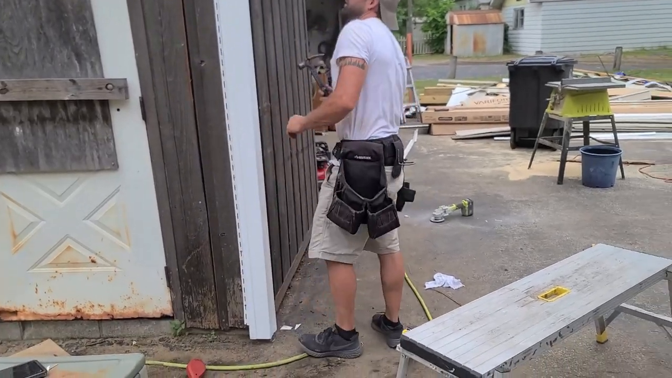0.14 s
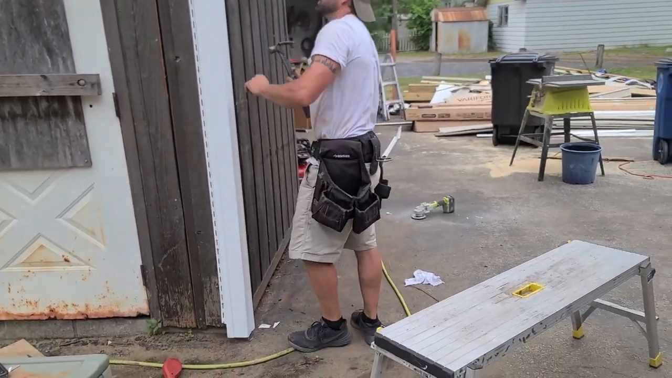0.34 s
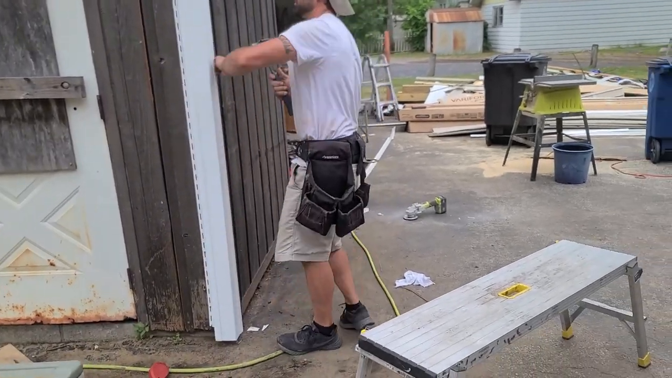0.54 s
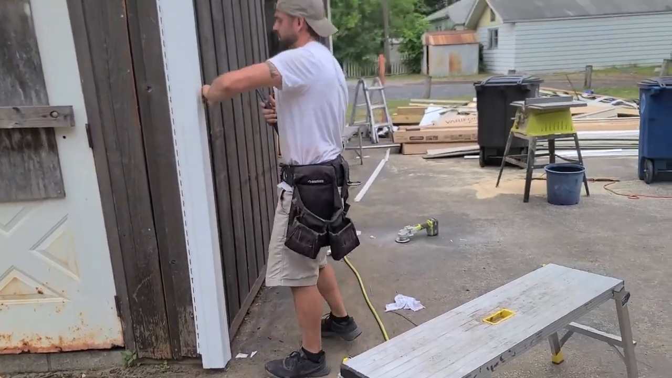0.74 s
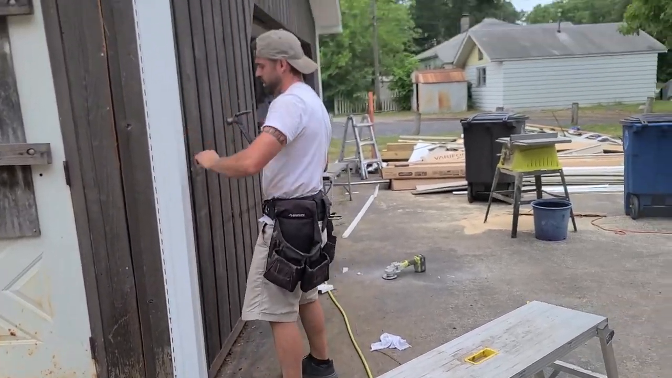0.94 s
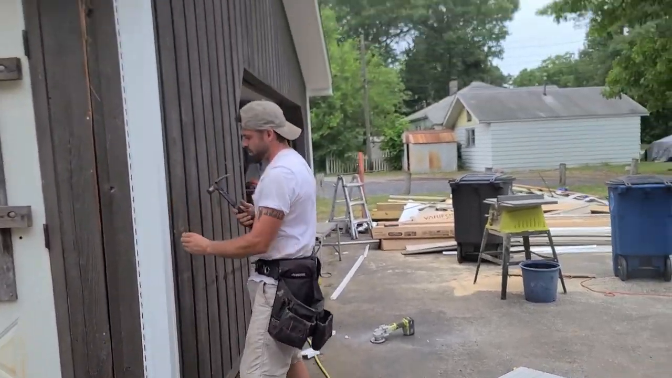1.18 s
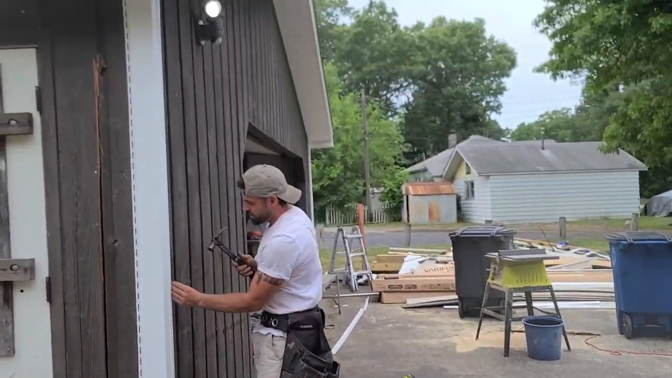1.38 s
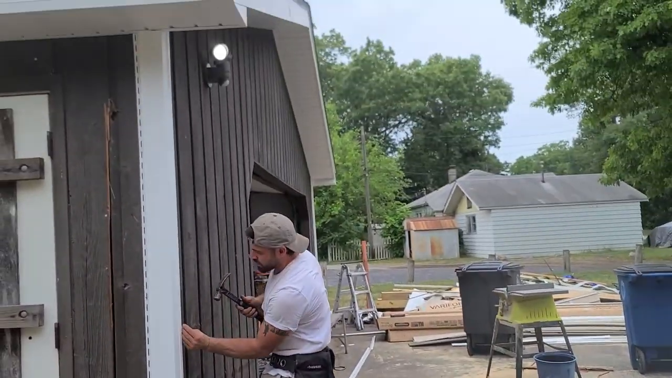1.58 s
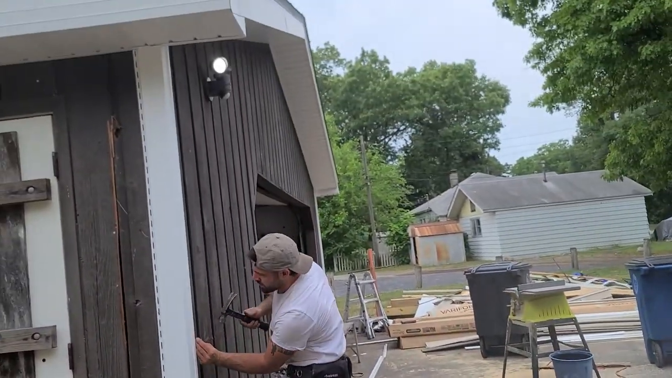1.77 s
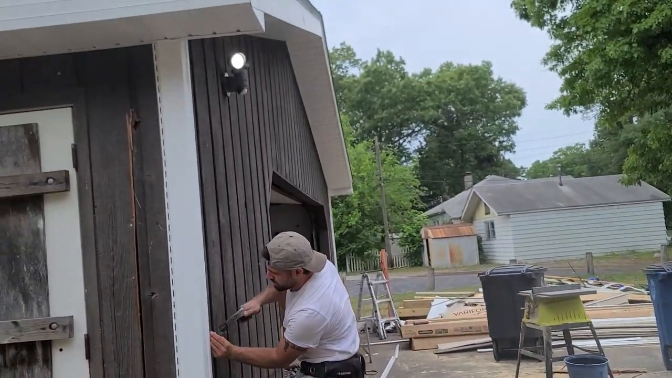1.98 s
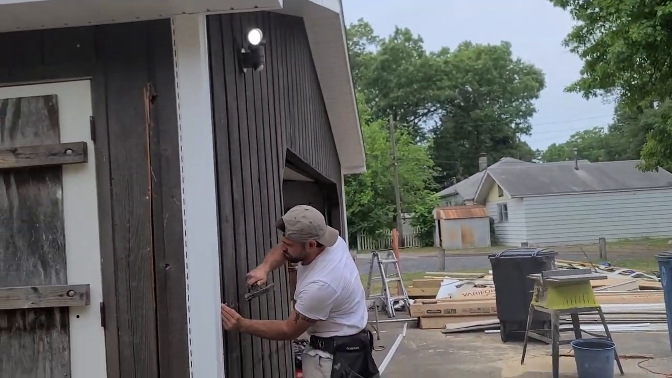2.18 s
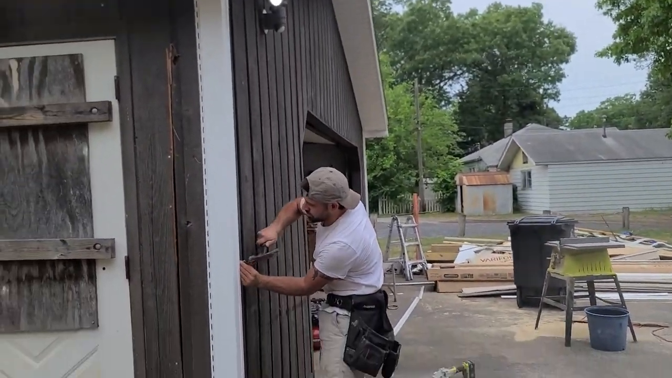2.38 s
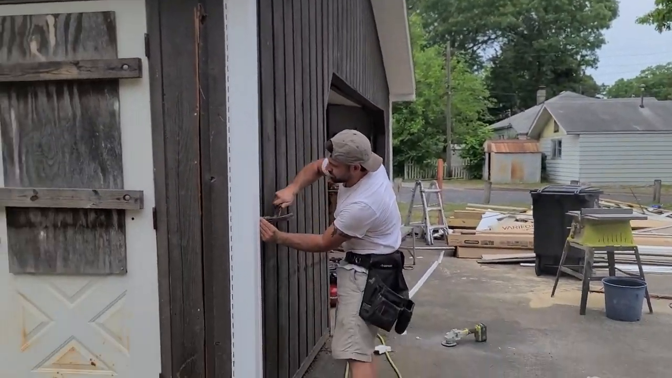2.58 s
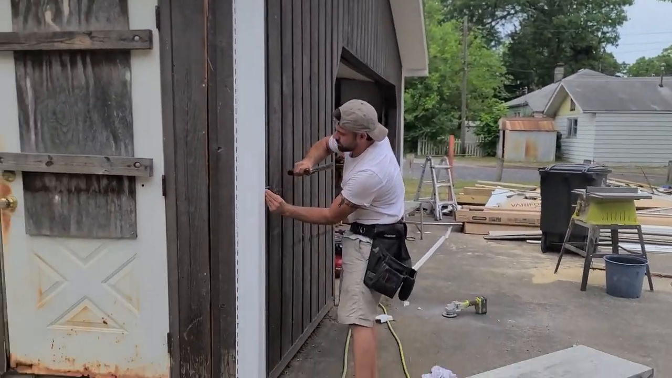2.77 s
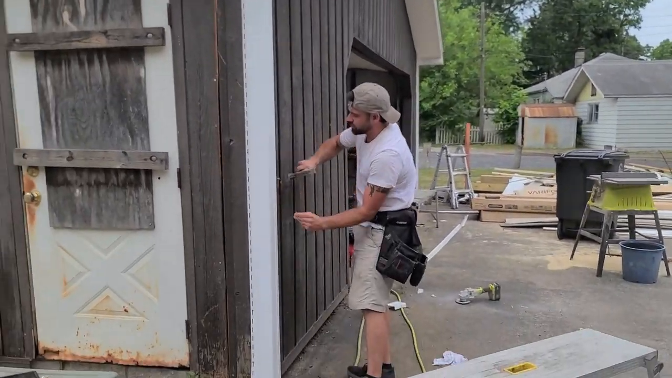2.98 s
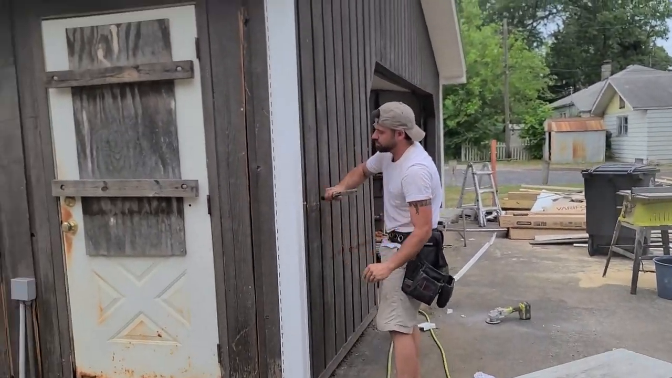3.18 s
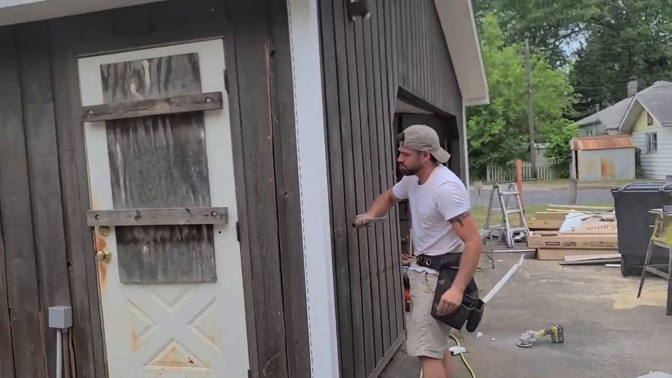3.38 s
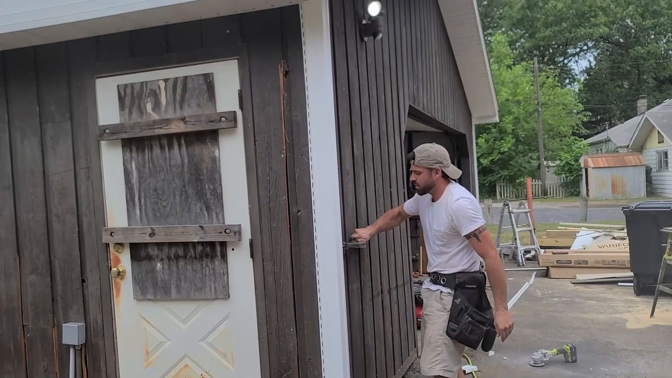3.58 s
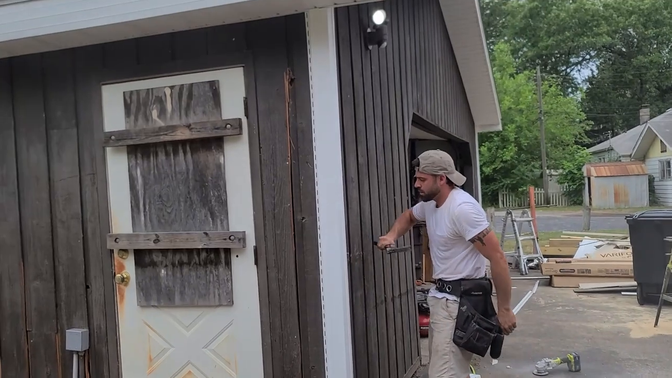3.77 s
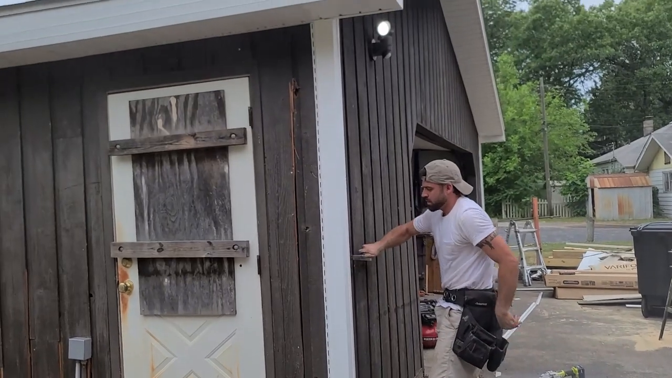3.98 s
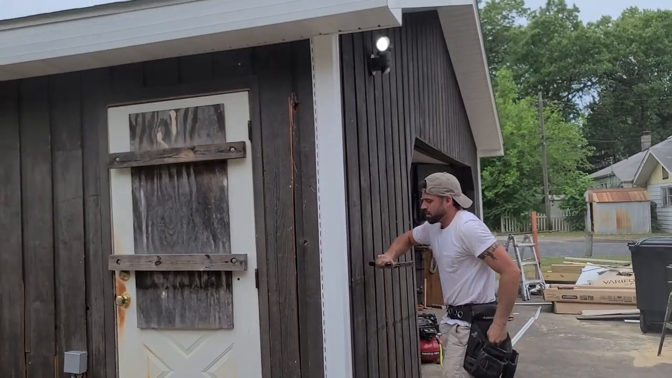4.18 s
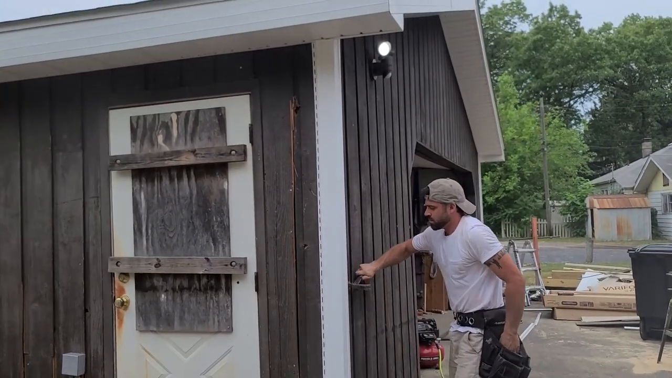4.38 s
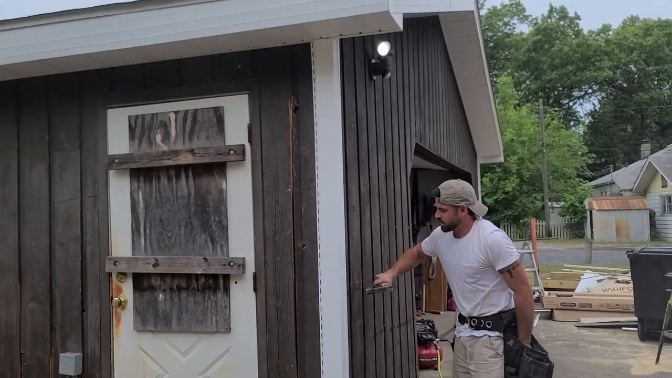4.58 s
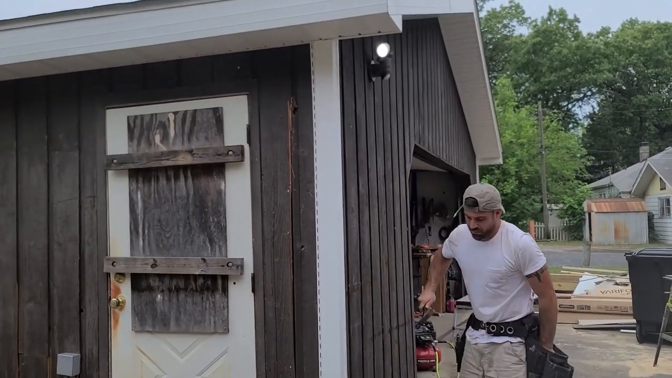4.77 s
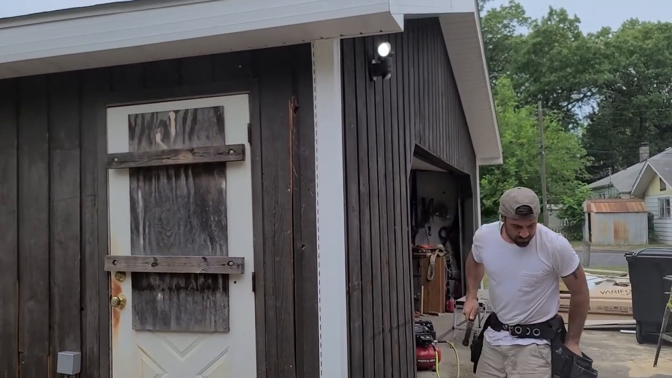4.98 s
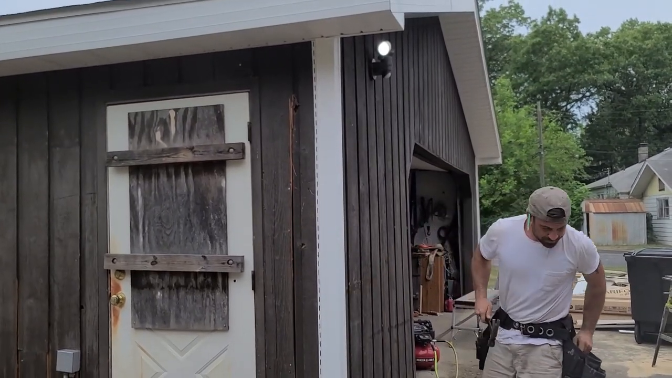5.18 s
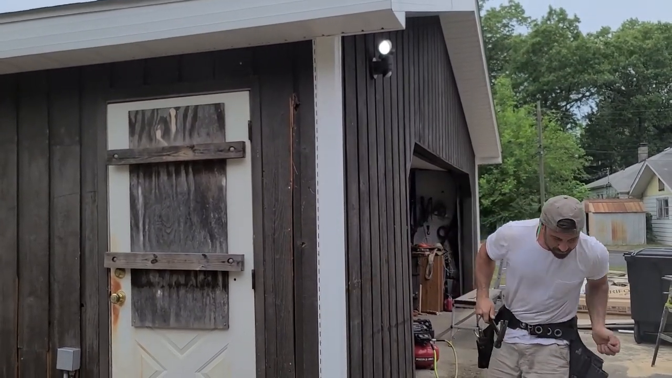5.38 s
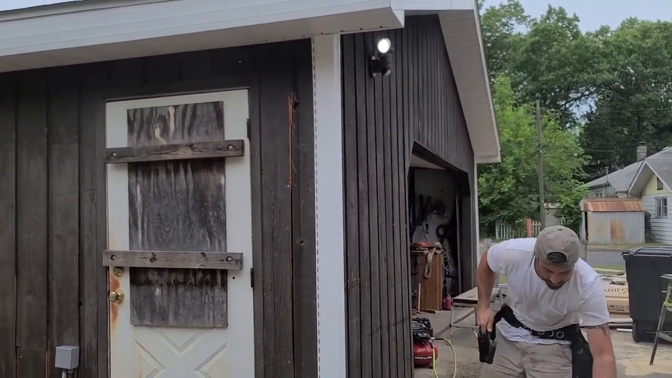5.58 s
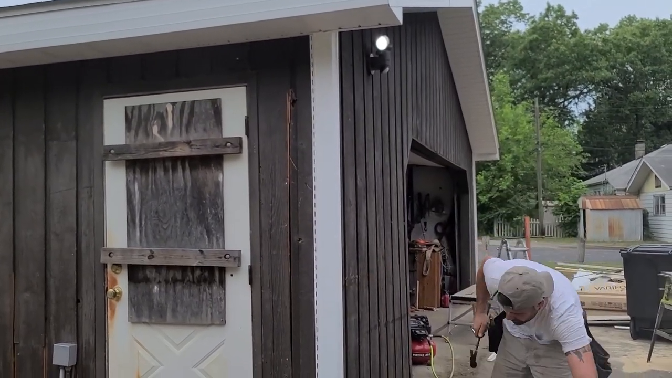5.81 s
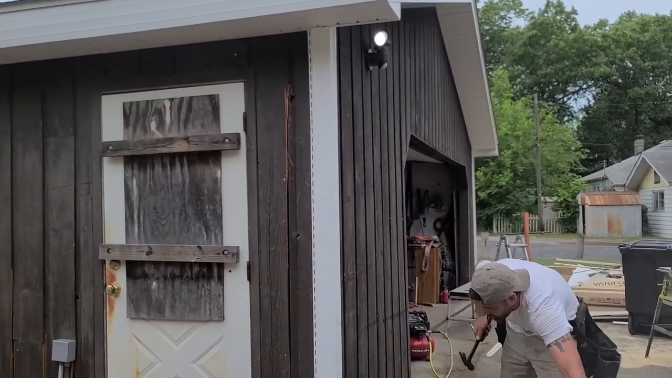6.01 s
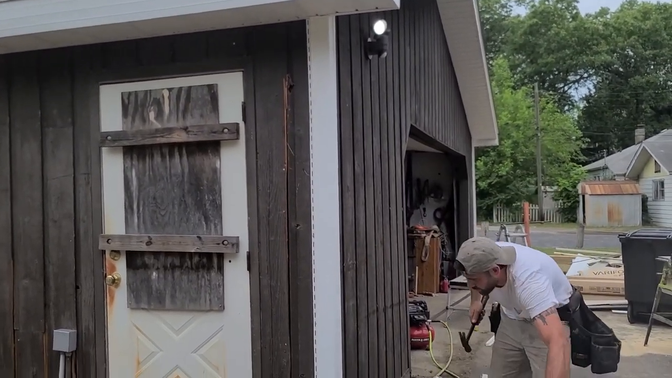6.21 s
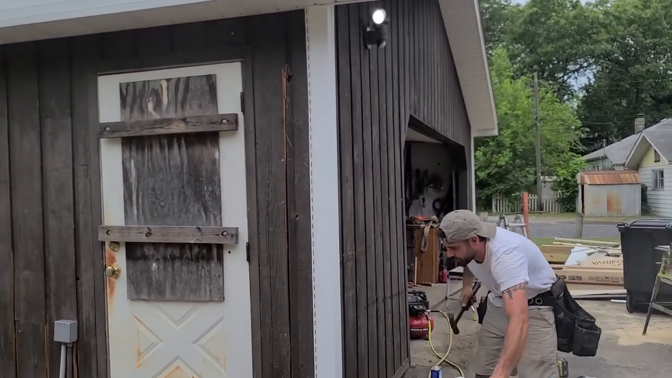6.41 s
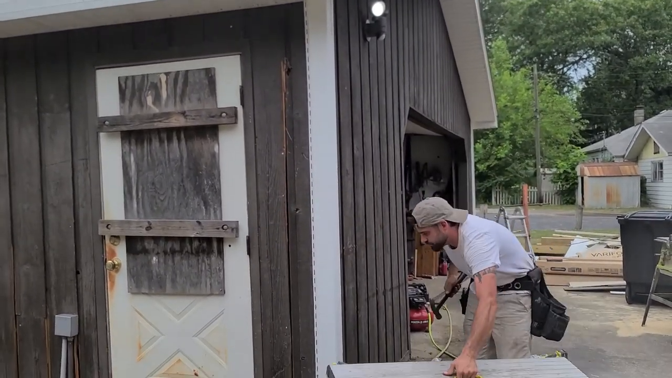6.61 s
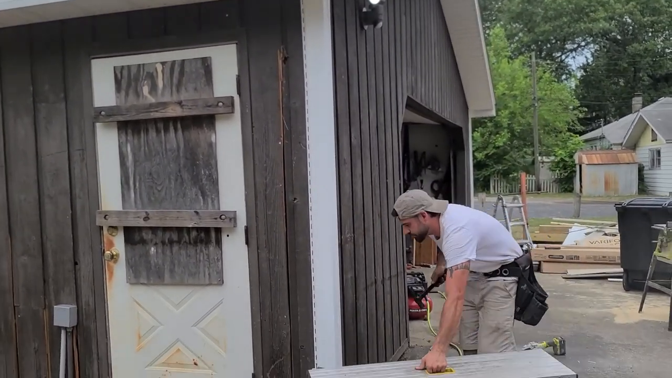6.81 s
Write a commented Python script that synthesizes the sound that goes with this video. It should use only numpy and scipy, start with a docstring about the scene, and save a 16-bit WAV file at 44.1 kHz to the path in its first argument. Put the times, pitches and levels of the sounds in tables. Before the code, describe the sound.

Over distant traffic, a soft breeze and a far bird's falling whistles, someone shuffles on concrete with tools knocking, once loudly. Seven sharp hammer blows follow, nailing a vinyl corner post to a shed; the wooden wall rings hollow and the sound scatters briefly around the yard. Afterwards come light tool clicks, a faint shoe squeak, a dull thud and the rattle of a metal work bench being grabbed.

```python
"""Outdoors at a shed, a hammer drives a nail through a vinyl corner post into a hollow wooden wall.
Each blow cracks, rings the wall's modes, rattles the post and scatters back from the yard.
Around the blows nails ring as they touch, tools and pouch knock in puffs of noise, shoes scuff and
squeak on concrete, and a metal work bench rattles as it is grabbed. A far bird whistles falling
notes over a noise bed of low traffic rumble and a light breeze."""
import sys
import numpy as np
from scipy import signal
from scipy.io import wavfile
from scipy.ndimage import uniform_filter1d

SR = 44100
rng = np.random.default_rng(int(sys.argv[2]) if len(sys.argv) > 2 else 0)


def master(y):
    """Save y as 16-bit WAV."""
    cut = np.clip(np.atleast_2d(y).T, -1, 1)
    pcm = np.round(cut * 32767)  # scale
    wavfile.write(sys.argv[1], SR, pcm.astype(np.int16))


N = 302085


def amp(db):
    """Gain of a level in dB."""
    return 10 ** (np.asarray(db) / 20)


def unit_rms(x):
    """The signal scaled to rms 1."""
    return x / np.sqrt(np.mean(x ** 2) + 1e-20)


def at_hz(points, hz):
    """A curve read on a log-frequency axis."""
    points = np.array(points)
    return np.interp(np.log(hz), np.log(points[:, 0]), points[:, 1])


def automation(rows, column, outside=None):
    """One column as a curve over the scene; past its ends it holds, or takes the outside value."""
    rows = np.array(rows)
    return np.interp(np.arange(N) / SR, rows[:, 0], rows[:, column], outside, outside)


def drift(rate_hz):
    """Smooth random modulation over the scene, rms 1."""
    pole = np.exp(-80 * np.pi * rate_hz / SR)
    white = rng.standard_normal(N // 40 + 2002)
    slow = signal.lfilter([1], [1, -2 * pole, pole * pole], white)[2000:]
    return np.interp(np.arange(N) / 40, np.arange(len(slow)), unit_rms(slow))


def chatter(size, width_s):
    """Uneven loudness of loose parts: smoothed noise, rms 1."""
    width = int(width_s * SR)
    return unit_rms(uniform_filter1d(uniform_filter1d(rng.standard_normal(size), width), width))


def ring(x, hz, t60):
    """One mode: a unit click sets off a dying sine of height 1."""
    r, w = amp(-60 / (t60 * SR)), 2 * np.pi * hz / SR
    return signal.lfilter([0, np.sin(w)], [1, -2 * r * np.cos(w), r * r], x + 1e-18)


def band(x, low_hz, high_hz, order=2):
    """Butterworth band-pass."""
    return signal.sosfilt(signal.butter(order, [low_hz, high_hz], "band", fs=SR, output="sos"), x)


def stereo_bands(size, correlation_at):
    """Yields (centre_hz, stereo noise) in third octaves, each with its own stereo width."""
    edges_hz = 20 * 2 ** (np.arange(30) / 3)
    white = rng.standard_normal((2, 2, size))
    for k, (low, high) in enumerate(zip(edges_hz, edges_hz[1:])):
        hz = np.sqrt(low * high)
        mid, side = band(white[k % 2], low, high)
        alike = np.clip(correlation_at(hz), 0, 1)
        yield hz, np.sqrt(1 + alike) * mid + np.sqrt(1 - alike) * side * [[1], [-1]]


def puff(t, low_hz, high_hz, t60):
    """A burst of band noise with a fast attack and a grainy decay, partly alike left and right."""
    noise = rng.standard_normal(len(t)) + 0.87 * rng.standard_normal((2, len(t)))
    attack = 1 - np.exp(-t / (0.01 * t60))
    decay = amp(-60 * t / max(t60, .004) + 1.6 * chatter(len(t), 0.00093))
    return unit_rms(band(noise, low_hz, min(high_hz, 18000))) * attack * decay


# From then on knocks and bench jolts reach the left channel slightly later
LAG_FROM_S, LEFT_LAG_S = 4.6, .00035


def place(out, start_s, sound, pan_db=0.):
    """Mixes a one-shot in; pan_db is left minus right, and after LAG_FROM_S the left side lags."""
    sound = sound * amp([[pan_db / 2], [-pan_db / 2]])
    for channel, lag_s in enumerate([LEFT_LAG_S * (start_s > LAG_FROM_S), 0]):
        i = int((start_s + lag_s) * SR)
        out[channel, i:i + sound.shape[1]] += sound[channel, :N - i]


# Fader moves of the ambience: time_s, rumble_db, drone_db, mid_air_db, hiss_db
AMBIENCE_FADERS = [(0.0, -37.5, -49, -61.5, -79), (0.4, -39, -49.5, -57.5, -74),
                   (1.1, -35.5, -44.5, -53, -72), (1.6, -38.5, -49, -55, -89),
                   (2.0, -37.5, -49, -57.5, -68), (2.35, -36, -47.5, -57, -79),
                   (3.2, -36.5, -47.5, -50.5, -72), (3.85, -38.5, -51.5, -57.5, -80),
                   (4.4, -40, -53, -59, -71), (4.7, -41, -51, -57, -69.5), (5.3, -39.5, -52.5, -63, -85),
                   (5.9, -37.5, -48.5, -58.5, -81), (6.5, -35.5, -47, -52.5, -72),
                   (6.85, -39, -44.5, -52.5, -70)]
# Tone shaping ahead of those faders: freq_hz, gain_db
AMBIENCE_EQ = [(12, -44), (20, -14.5), (74, 1), (210, -23.5), (234, -23.5), (270, -23.5), (410, -26.5),
               (542, -38), (759, -32), (1090, -43), (1480, -42), (3250, -46), (8890, -61), (13900, -35.5),
               (16000, -76)]
# Centred lows, wide highs: freq_hz, left_right_correlation
AMBIENCE_CORRELATION = [(60, 0.98), (180, 0.99), (550, 0.63), (1650, 0.0019), (4970, 0.0), (15000, 0)]


def traffic_and_breeze():
    """Far traffic, mid-band outdoor wash and hiss: four noise layers on faders, swaying in one gust."""
    layers, gust = np.zeros((4, 2, N)), drift(2.5)
    for hz, noise in stereo_bands(N, lambda f: at_hz(AMBIENCE_CORRELATION, f)):
        k = np.searchsorted([170, 1100, 7000], hz)   # crossovers in Hz
        layers[k] += noise * amp(at_hz(AMBIENCE_EQ, hz) + 2.76 * gust + 1.67 * drift(9.8))
    faders_db = [automation(AMBIENCE_FADERS, column) for column in (1, 2, 3, 4)]
    faders_db[3] += 1.6 * drift(9.9)   # the hiss flickers
    return sum(unit_rms(layer) * amp(db) for layer, db in zip(layers, faders_db)) * amp([[-.4], [.4]])


# Nails touching: start_s, level_db
NAIL_CLINKS = [(0.2264, -49.5), (0.3436, -64)]
# The ring of a nail: pitch_hz, gain_db, t60_s
NAIL_MODES = [(3420, -6, 0.27), (4020, -24, 0.53), (4495, -6, 0.16), (5782, -8, 0.16), (7540, -15, 0.11),
              (8000, -27, 0.25), (9367, -10.5, 0.13), (10510, -15, 0.16), (11400, -20, 0.17),
              (11920, -36, 0.16), (12880, -25, 0.12), (13160, -32.5, 0.2)]


def nail_clinks():
    """Each touch strikes every mode of a nail with its own strength."""
    out, click = np.zeros((2, N)), 1. * (np.arange(SR // 3) == 0)
    for start_s, level_db in NAIL_CLINKS:
        clink = sum(ring(click, hz, t60) * amp(db + 2 * rng.standard_normal())
                    for hz, db, t60 in NAIL_MODES)
        place(out, start_s, amp(level_db + 1) * clink)
    return out


# Falling whistles: start_s, end_s, first_hz, target_hz, glide_s, level_db
BIRD_NOTES = [(.33, .6, 5000, 4350, .25, -70), (1.7, 1.85, 4750, 4380, .04, -69),
              (1.98, 2.24, 4880, 4750, .15, -70), (3.47, 3.62, 4850, 4810, .1, -65),
              (5.74, 5.86, 5400, 4950, .06, -73), (5.762, 6.225, 6050, 4570, .13, -65)]


def bird():
    """A far bird, a little to the left: wavering sine notes that slide down toward a pitch."""
    out, t = np.zeros(N), np.arange(N) / SR
    for start_s, end_s, first_hz, target_hz, glide_s, level_db in BIRD_NOTES:
        hz = target_hz + (first_hz - target_hz) * np.exp(-np.clip(t - start_s, 0, 1) / glide_s)
        phase = 2 * np.pi * np.cumsum(hz * (1 + .008 * drift(150))) / SR
        gate = np.clip(np.minimum(t - start_s, (end_s - t) / 2) / 0.0091, 0, 1)
        out += np.sin(phase) * gate * amp(level_db + 3.5 * drift(25))
    return out * amp([[1.5], [-1.5]])


# Tools, pouch and shoes knocking: start_s, level_db, centre_hz, width_octaves, t60_s, pan_db
GEAR_KNOCKS = [(0.382, -41, 1550, 0.59, 0.082, -8), (0.543, -40, 1620, 0.61, 0.06, -8),
               (0.6207, -9.5, 1350, 0.73, 0.1, -1.5), (0.7012, -24.5, 1500, 0.45, 0.14, -2.5),
               (0.8866, -37, 1500, 2.8, 0.059, -5), (1.1894, -17, 1870, 2.76, 0.019, -17.5),
               (1.287, -25.5, 2050, 0.55, 0.051, 4.5), (1.399, -31, 410, 0.3, 0.21, 1),
               (1.5263, -31, 420, 1.6, 0.07, 3.5), (1.589, -30, 1980, 1.12, 0.068, 8),
               (1.602, -27, 1570, 1.2, 0.07, 8), (1.666, -36.5, 3000, 1.1, 0.077, 16),
               (1.728, -40.5, 2360, 1.14, 0.088, 17), (1.8811, -43, 3940, 0.42, 0.055, 12),
               (1.9203, -40.5, 3640, 0.94, 0.21, 9), (2.033, -43.5, 4350, 0.77, 0.14, 11),
               (2.146, -42, 2180, 1.3, 0.1, 9), (2.2657, -47, 2380, 1.7, 0.051, 14),
               (4.3505, -38.5, 400, 0.9, 0.077, -2), (4.8004, -36.5, 2400, 0.63, 0.05, 12),
               (4.866, -34, 2330, 1.37, 0.046, 7), (4.987, -34, 2310, 0.81, 0.045, 12),
               (5.0051, -36.5, 2280, 2.27, 0.075, 5.5), (5.074, -27.5, 2200, 0.42, 0.05, 7.5),
               (5.2535, -27.5, 2310, 0.5, 0.055, 9.5), (5.6199, -35, 380, 1, 0.11, -4),
               (5.68, -40.5, 2480, 0.29, 0.063, 16), (5.7342, -18, 360, 1.18, 0.14, 1),
               (6.07, -39.5, 920, 1.2, 0.061, 5.5)]


def gear_knocks(faint_per_s=4, thud_db=-20):
    """Each knock is a puff in one broad resonance with a thud and a tick; faint ones fall at random."""
    out, t = np.zeros((2, N)), np.arange(SR // 4) / SR
    faint = [(when * N / SR, -48 + 8 * size, 900 * (3000 / 900) ** pitch, 1, 0.096, 10 * side)
             for when, size, pitch, side in rng.random((int(faint_per_s * N / SR), 4))]
    for start_s, level_db, hz, octaves, t60, pan_db in GEAR_KNOCKS + faint:
        half_width = 2 ** (octaves / 2)
        body = puff(t, hz / half_width, hz * half_width, t60) + amp(-20) * puff(t, 470, 2800, t60)
        thud = amp(thud_db) * puff(t, 246, 600, 3 * t60)
        # a broader, higher knock is a harder contact and ticks more
        tick_db = -47.5 + 17 * octaves + 7 * np.log2(hz / 2000)
        tick = amp(tick_db) * puff(t, 10000, 11000, .5 * t60)
        place(out, start_s, amp(level_db - 8) * (body + thud + tick), pan_db)
    return out


# Soles, cloth and pouch rubbing: start_s, length_s, attack_s, rasp_db, grit_db, hiss_db
SCUFFS = [(0.784, 0.23, 0.019, -47, -40.5, -51), (1.134, .075, 0.041, -49.5, -45.5, -60),
          (1.247, 0.073, 0.023, -45.5, -48.5, -63), (1.63, 0.084, 0.026, -50, -50, -70),
          (1.302, 0.22, 0.03, -51.5, -60, -76), (4.656, 0.13, 0.02, -60, -61, -75),
          (4.952, 0.065, 0.024, -61, -54, -70), (6.026, 0.069, 0.033, -54, -57, -75),
          (6.282, 0.26, 0.049, -51, -58, -80), (6.59, 0.34, 0.033, -53, -64, -81)]
# Tone of the rasp and grit: freq_hz, gain_db
SCUFF_EQ = [(180, -27), (300, -6), (398, 0), (468, 3.5), (1490, 6.5), (1900, -1), (3040, 2.5), (5970, -8.5),
            (7500, -25.5), (9750, -57), (16500, -120)]
# A stroke dulls as it slows: rasp_db_per_s, grit_db_per_s, hiss_db_per_s
SCUFF_DULLING = [14, -18.5, -30]


def scuffs(release_s=0.036, fade_depth_db=13.5):
    """Friction as three layers of grainy noise; through a stroke rasp grows, grit and hiss sink."""
    rasp_and_grit, t = np.zeros((2, 2, N)), np.arange(N) / SR
    for hz, noise in stereo_bands(N, lambda f: .5):
        gain = amp(at_hz(SCUFF_EQ, hz) + 2 * drift(20)) * (500 < hz < 7000)
        rasp_and_grit[int(hz > 2200)] += noise * gain
    hiss = band(rng.standard_normal((2, N)), 8600, 12000)
    gains = np.zeros((3, N))
    for start_s, length_s, attack_s, *levels_db in SCUFFS:
        inside = (t > start_s) & (t < start_s + length_s)
        age_s = t[inside] - start_s
        fade = np.clip(np.minimum(age_s / attack_s, (length_s - age_s) / release_s), 0, 1)
        shape_db = fade_depth_db * (fade - 1) + np.c_[SCUFF_DULLING] * age_s
        gains[:, inside] += amp(np.c_[levels_db] + shape_db)
    strokes = sum(unit_rms(layer) * gain for layer, gain in zip([*rasp_and_grit, hiss], gains))
    return amp(1.6 * drift(170)) * strokes


# A blow's sharp arrivals, direct and off the ground and eaves: delay_s, level_db, signed_gain
CRACK_TAPS = [(.0008, -2, 0.41), (.0026, -8.5, 0.5), (.0045, -13, -0.78), (.0062, -11, 0.29)]


def hammer_crack(size):
    """The impact and its early reflections as clicks, timed a little apart left and right."""
    clicks = np.zeros((2, size))
    for delay_s, level_db, signed_gain in CRACK_TAPS:
        at = ((delay_s + .0002 * rng.random(2)) * SR).astype(int)
        clicks[[0, 1], at] = signed_gain * amp(level_db + 2 * rng.standard_normal())
    return clicks


# The ring of the hollow wall: pitch_hz, gain_db, t60_s
WALL_MODES = [(44.7, -7, 0.63), (63.5, 5, 0.26), (73.6, 4.5, 0.25), (99.5, 0.5, 0.24), (173, -15, 0.17),
              (199.7, -19, .2), (272.3, 2.5, 0.16), (332, 14.5, 0.1), (387.5, 4, 0.11), (500, -10, 0.027),
              (739, 2, 0.14), (963, -1.5, 0.034), (981, -0.5, 0.07), (1338, 1, 0.078), (1487, -8, 0.063),
              (1746, 5.5, 0.022), (1973, -3, 0.065), (2454, -8, 0.055), (2650, -20, 0.017),
              (2940, -1, 0.049), (3186, 2.5, 0.045), (3520, -28, 0.04), (3720, -21, 0.02)]


def wall_ring(t, blow_eq_db):
    """A blow rings every mode of the wall; the low ones start later and swell more slowly."""
    out, click = 0, 1. * (t == 0)
    for hz, level_db, t60 in WALL_MODES:
        late = int(.22 * SR / hz)   # big panels take part of a cycle to get going
        swell = np.roll(1 - np.exp(-t * hz / .5), late)
        variation_db = 2 * rng.standard_normal() + 0.5 * rng.standard_normal((2, 1))
        mode = swell * ring(np.roll(click, late), hz, t60)
        out = out + mode * amp(level_db + blow_eq_db(hz) + variation_db)
    return out


# Tone of the rattling post and boards: freq_hz, gain_db
CLATTER_EQ = [(94, -27.5), (160, -11), (206, -5.5), (346, -0.5), (600, -7.5), (839, -10.5), (1920, -15),
              (2080, -16), (2820, -15.5), (3230, -17), (6110, -25), (7690, -27), (13500, -23), (16000, -18)]
# Decay of that rattle: freq_hz, t60_s
RATTLE_DECAY = [(150, 0.064), (700, 0.07), (2500, 0.079), (6000, 0.052), (14000, 0.015)]
# Tail scattered by yard and trees: freq_hz, t60_s
YARD_DECAY = [(150, 0.47), (400, 0.23), (1040, 0.22), (2760, 0.18), (6000, 0.16), (10000, 0.13),
              (15000, 0.056)]
# Tone of the blurred slap off the houses around: freq_hz, gain_db
SLAP_EQ = [(500, -11), (900, -7.5), (3400, 2.5), (6000, -2), (9000, -7.5), (15000, -14)]


def post_clatter(t, clicks, blow_eq_db, decay_scale, shared_chatter, slap_s=0.13, slap_spread_s=0.078):
    """Band by band: the crack, the rattle of post and boards, the yard's tail and the far slap."""
    out = 0
    slap = amp(-41.5) * np.exp(-((t - slap_s) / slap_spread_s) ** 4)
    for hz, noise in stereo_bands(len(t), lambda f: np.clip(470 / f, .3, .9)):
        rattle = (1 - np.exp(-t / 0.0033)) * amp(-60 * t / (decay_scale * at_hz(RATTLE_DECAY, hz)))
        yard = (1 - np.exp(-t / 0.013)) * amp(-9 - 60 * t / (decay_scale * at_hz(YARD_DECAY, hz)))
        echoes = yard + slap * amp(at_hz(SLAP_EQ, hz))
        flutter = amp(1.5 * shared_chatter + 3.5 * chatter(len(t), .012))
        crack = amp(25.5 if hz < 7200 else 18.5) * band(clicks, hz / 2 ** (1 / 6), hz * 2 ** (1 / 6))
        gain = amp(at_hz(CLATTER_EQ, hz) + 31 + blow_eq_db(hz)) * (hz > 140)
        out = out + gain * (noise * (rattle + flutter * echoes) + crack)
    return out


# The hits, each with a five-band EQ and a stretch on its rattle and yard tail:
# start_s, level_db, boom_db, board_db, crack_db, steel_db, steel_top_db, decay_scale
HAMMER_BLOWS = [(2.39, -23.5, 4.5, -19, -15, -19, -33, 2.04), (2.614, -5, -9, -21, -16, -20.5, -35, 0.98),
                (2.956, -3, -11, -24, -17.5, -19, -25, 0.96),
                (3.289, 0, -16.5, -26, -19.5, -20.5, -20, 0.89),
                (3.634, -5, -15.5, -21.5, -16, -23.5, -29, 1.34),
                (4.03, -2.5, -16.5, -23, -21, -19, -25, 0.87),
                (4.435, -3.5, -16.5, -18.5, -19, -23.5, -15.5, 0.86)]
# Centres of that EQ: boom_hz, board_hz, crack_hz, steel_hz, steel_top_hz
BLOW_BANDS_HZ = [80, 320, 1300, 3900, 11000]
# Where each register of a blow sits, left minus right: freq_hz, pan_db
BLOW_PAN = [(60, -1), (180, 0), (550, -3.5), (1650, 5), (4970, 6), (9500, -4.5), (14000, 0.5)]


def hammer():
    """Each blow on the nail cracks, rings the wall and rattles the post with its own tone."""
    out, t = np.zeros((2, N)), np.arange(SR * 2 // 5) / SR
    for start_s, level_db, *bands_db, decay_scale in HAMMER_BLOWS:
        tone = list(zip(BLOW_BANDS_HZ, bands_db))

        def eq_db(hz):
            return at_hz(tone, hz) + at_hz(BLOW_PAN, hz) * np.array([[.5], [-.5]])

        shared_chatter = chatter(len(t), .004)
        clicks = hammer_crack(len(t))
        wall = wall_ring(t, eq_db)
        clatter = post_clatter(t, clicks, eq_db, decay_scale, shared_chatter)
        place(out, start_s, amp(level_db) * (wall + clatter))
    return out


# Pulses of a thin high sizzle: peak_s, level_db
SIZZLE_PULSES = [(4.574, -67.5), (4.71, -61), (4.83, -65), (4.962, -65), (5.06, -70), (5.19, -68)]


def sizzle(rise_db_per_s=302, fall_db_per_s=129.5):
    """A narrow band of top-end noise that swells fast and falls more slowly on each pulse."""
    t = np.arange(N) / SR
    pulses_db = [level_db - np.maximum(rise_db_per_s * (peak_s - t), fall_db_per_s * (t - peak_s))
                 for peak_s, level_db in SIZZLE_PULSES]
    noise = unit_rms(band(rng.standard_normal((2, N)), 13500, 14250, order=3))
    return noise * amp(np.max(pulses_db, axis=0) + 4 * drift(30))


# Path of the squeak: time_s, second_partial_hz, level_db
SQUEAK_PATH = [(5.55, 1419, -83), (5.562, 1473, -61), (5.592, 1696, -58), (5.622, 1657, -59),
               (5.662, 1800, -57), (5.7, 1780, -60)]


def sole_squeak():
    """A sole squeaks on concrete: three wavering partials bend upward, the second loudest."""
    pitch_hz = automation(SQUEAK_PATH, 1) / 2 * (1 + 0.0087 * drift(91))
    phase = 2 * np.pi * np.cumsum(pitch_hz) / SR
    tone = amp(-2) * np.sin(phase) + np.sin(2 * phase) + amp(-6) * np.sin(3 * phase)
    return tone * amp(automation(SQUEAK_PATH, 2, outside=-200) + 1.8 * drift(50))


# Jolts of the grabbed bench: start_s, level_db, centre_hz, brightness_db
BENCH_JOLTS = [(6.216, -27.5, 466, -22), (6.276, -25.5, 1310, -33), (6.3, -19, 620, -41),
               (6.323, -28.5, 710, -29), (6.365, -19, 1360, -39), (6.419, -17.5, 1510, -42),
               (6.487, -42, 715, -24), (6.603, -35.5, 3000, -4), (6.624, -24, 2930, -11),
               (6.642, -30.5, 493, -26), (6.7, -26.5, 845, -5), (6.71, -18.5, 704, -9.5),
               (6.728, -24.5, 635, -30), (6.751, -27.5, 635, -16), (6.811, -31.5, 400, -9),
               (6.834, -34.5, 866, -10)]
# The metal frame before damping: pitch_hz, gain_db, undamped_t60_s
FRAME_MODES = [(360, 1.5, 0.27), (715, 5, 0.17), (1490, 0.5, 0.33), (1990, -4, 0.069), (2730, -7, 0.17),
               (2990, -3, 0.17), (3210, -8, 0.059), (4000, -34, 0.084), (4440, -31, 0.05),
               (5900, -36, 0.058), (6105, -44, 0.15)]


def work_bench(rattle_t60_s=0.094, damped_t60_s=.025):
    """Each jolt is a cluster of contacts into the damped modes of the frame, plus loose rattle."""
    out, t = np.zeros((2, N)), np.arange(SR // 3) / SR
    for start_s, level_db, hz, brightness_db in BENCH_JOLTS:
        contact = amp(-30) * puff(t, 224, 2800, 0.76 * rattle_t60_s)
        frame = sum(ring(contact, mode_hz, min(t60, damped_t60_s)) * amp(db + 2 * rng.standard_normal())
                    for mode_hz, db, t60 in FRAME_MODES)
        body = puff(t, hz / 1.13, hz * 1.15, rattle_t60_s)
        rattle = amp(-0.5) * puff(t, 870, 1910, rattle_t60_s)
        bright = amp(brightness_db) * puff(t, 3600, 5200, rattle_t60_s)
        tick = amp(brightness_db - 10.5) * puff(t, 8600, 14400, 0.6 * rattle_t60_s)
        place(out, start_s, amp(level_db - 8) * (frame + body + rattle + bright + tick), pan_db=5)
    return out


def scene():
    """The stereo mix of all sources."""
    work = hammer() + gear_knocks() + work_bench() + nail_clinks()
    return work + bird() + sole_squeak() + scuffs() + sizzle() + traffic_and_breeze()


def record(dry):
    """The microphones dip in a band of the treble; peaks are rounded and the top is cut."""
    dip_low_hz, dip_high_hz, cutoff_hz = 7270, 10020, 16900
    below = signal.sosfilt(signal.butter(10, dip_low_hz, fs=SR, output="sos"), dry)
    above = signal.sosfilt(signal.butter(2, dip_high_hz, "high", fs=SR, output="sos"), dry - below)
    rounded = 1.2 * np.tanh((below + above) / 1.2)
    return signal.sosfilt(signal.cheby2(12, 70, cutoff_hz, fs=SR, output="sos"), rounded)


dry = scene()
out = record(dry)
master(out)
```